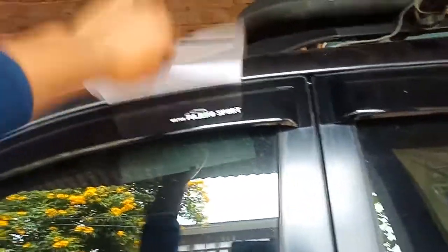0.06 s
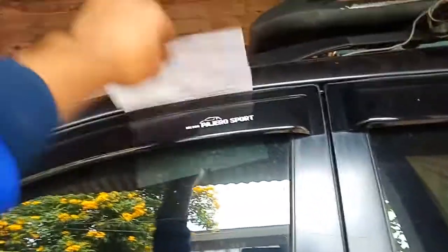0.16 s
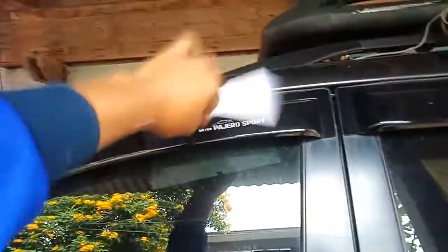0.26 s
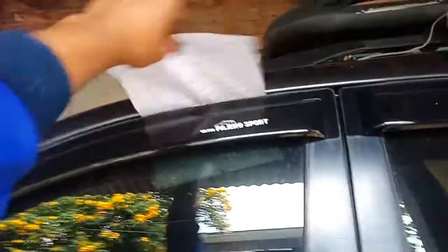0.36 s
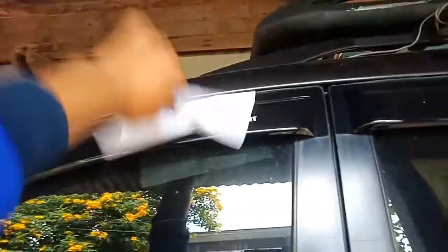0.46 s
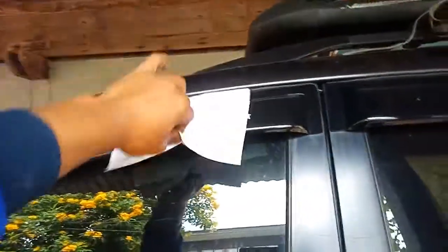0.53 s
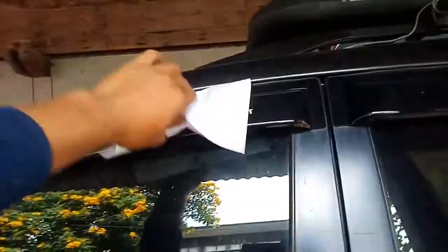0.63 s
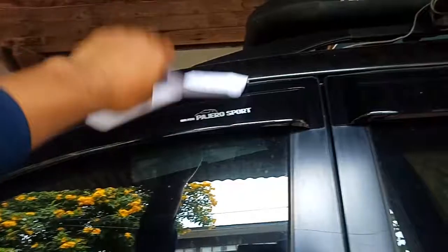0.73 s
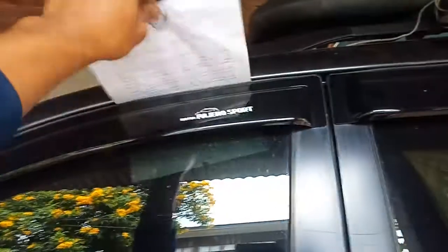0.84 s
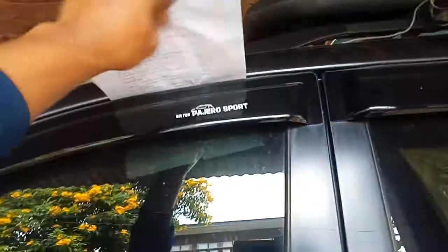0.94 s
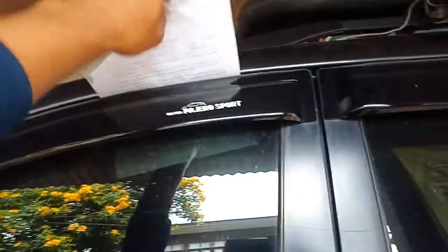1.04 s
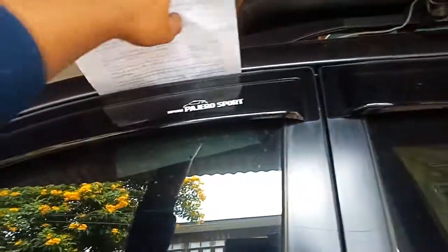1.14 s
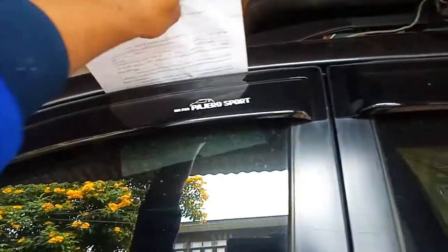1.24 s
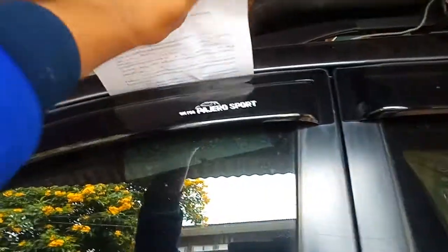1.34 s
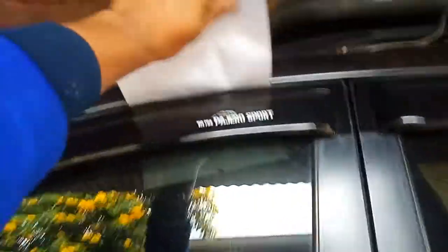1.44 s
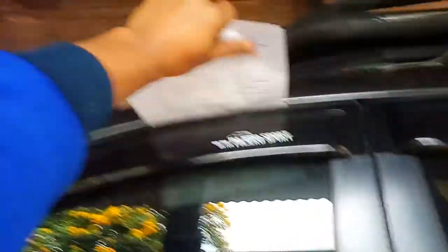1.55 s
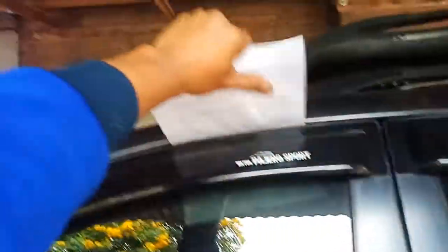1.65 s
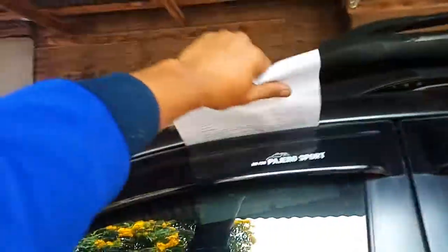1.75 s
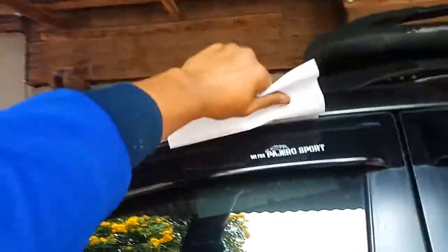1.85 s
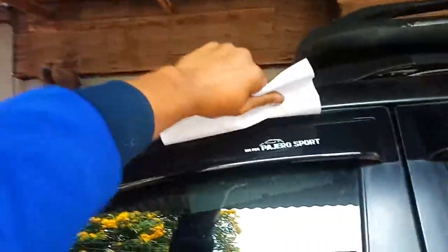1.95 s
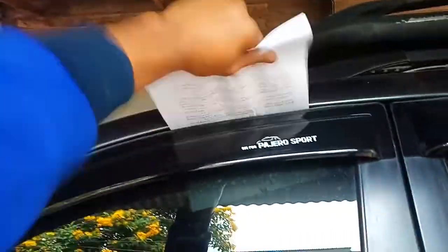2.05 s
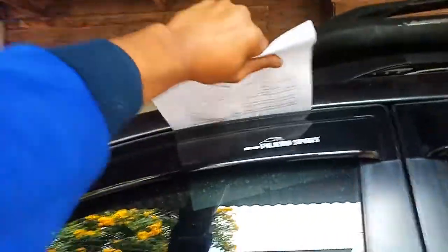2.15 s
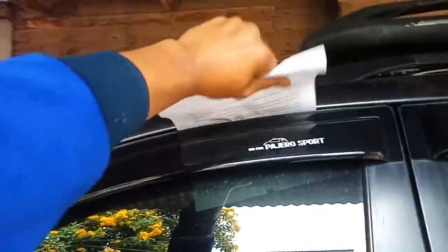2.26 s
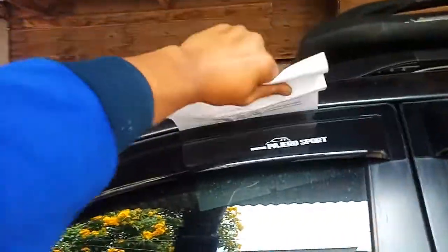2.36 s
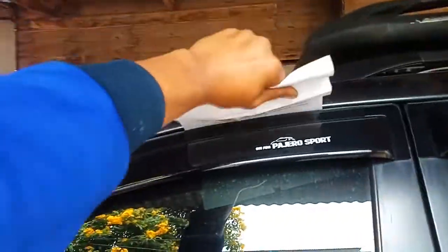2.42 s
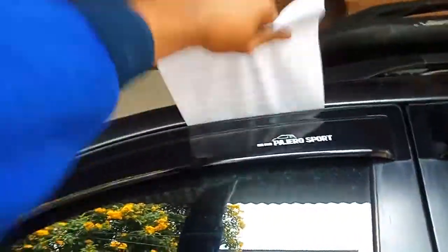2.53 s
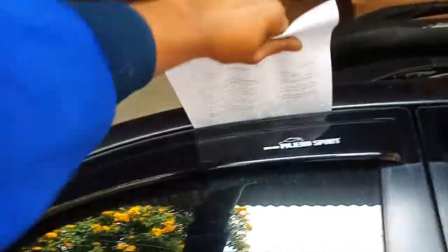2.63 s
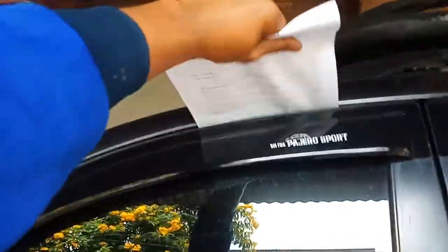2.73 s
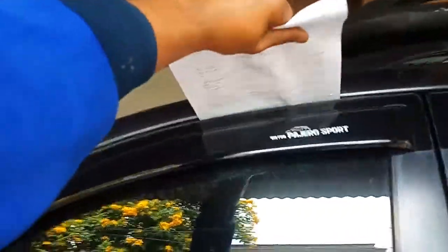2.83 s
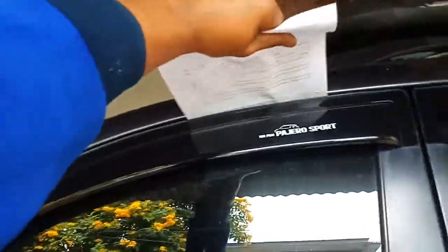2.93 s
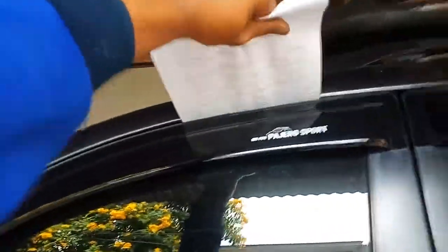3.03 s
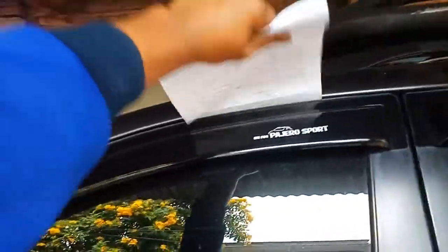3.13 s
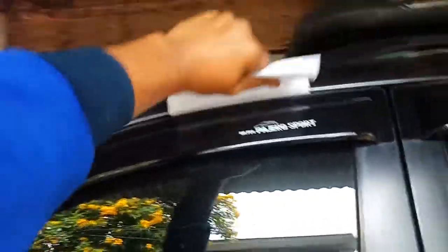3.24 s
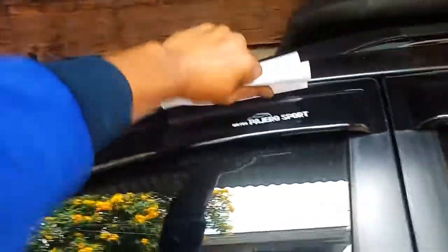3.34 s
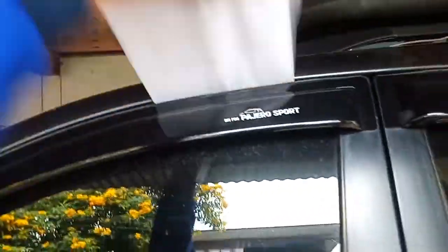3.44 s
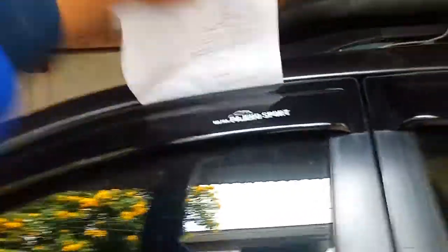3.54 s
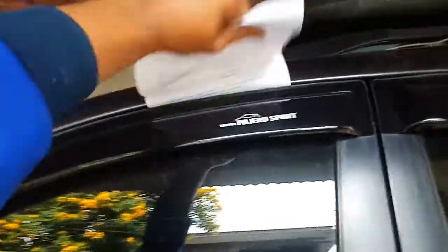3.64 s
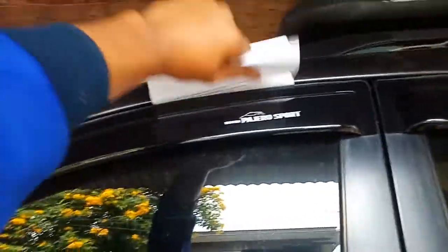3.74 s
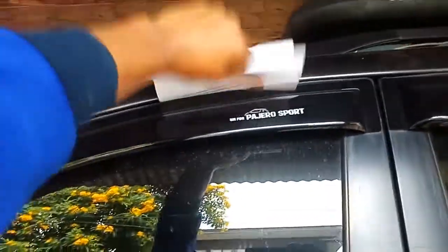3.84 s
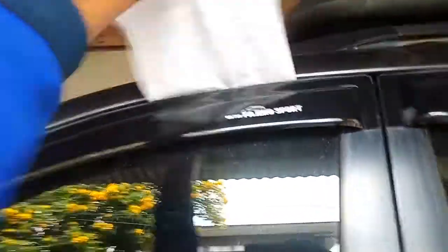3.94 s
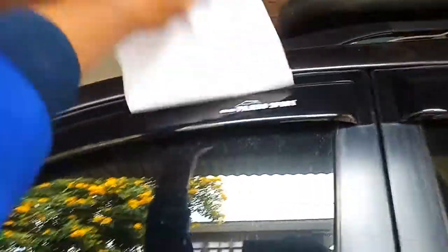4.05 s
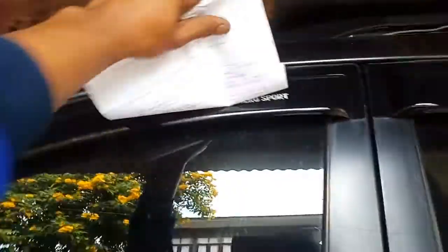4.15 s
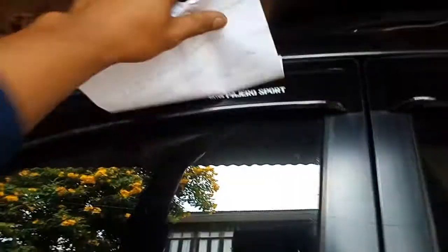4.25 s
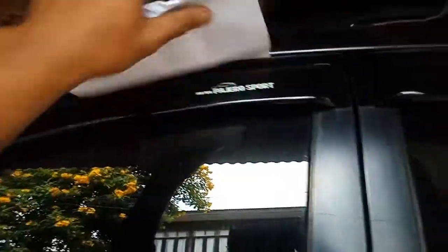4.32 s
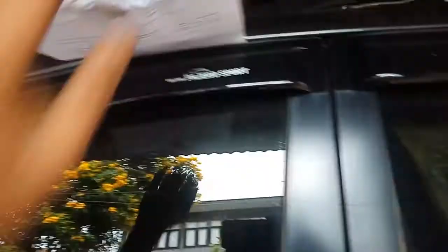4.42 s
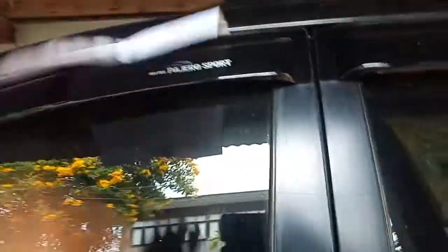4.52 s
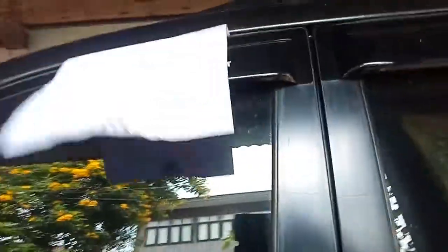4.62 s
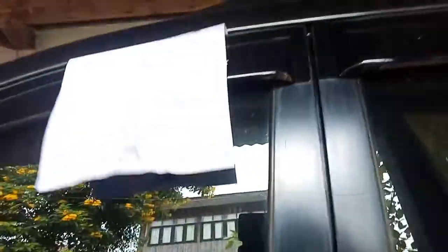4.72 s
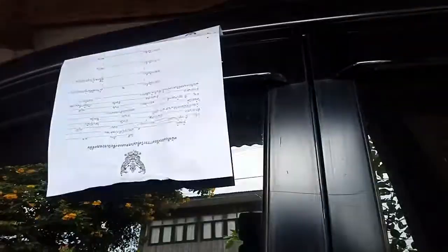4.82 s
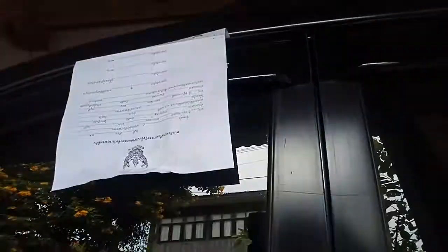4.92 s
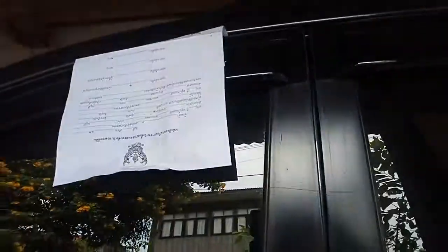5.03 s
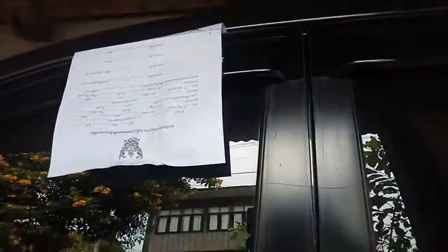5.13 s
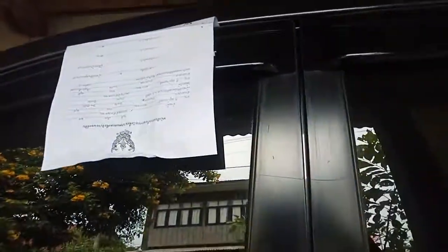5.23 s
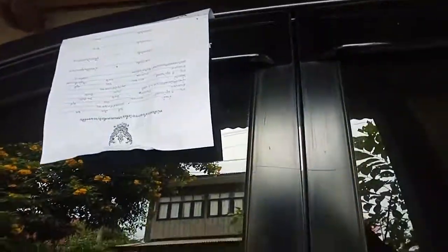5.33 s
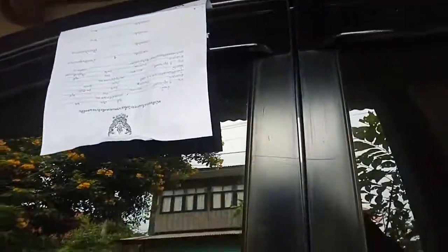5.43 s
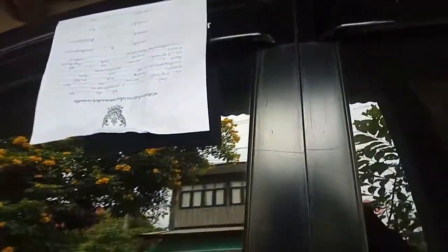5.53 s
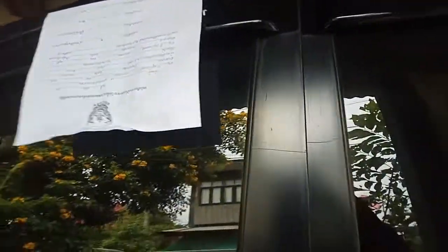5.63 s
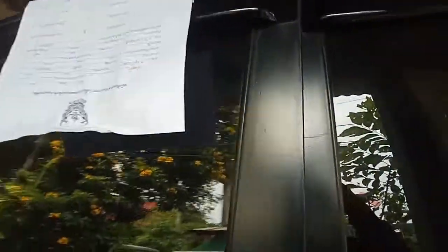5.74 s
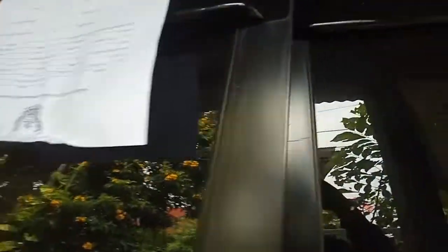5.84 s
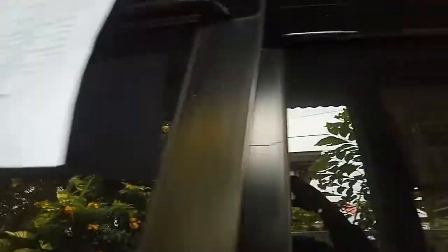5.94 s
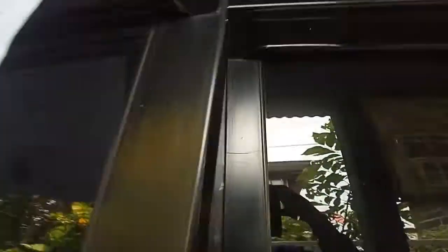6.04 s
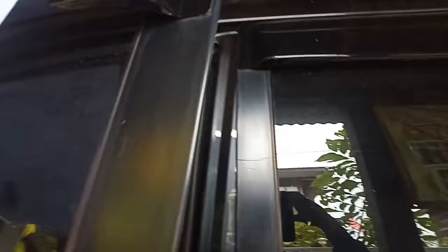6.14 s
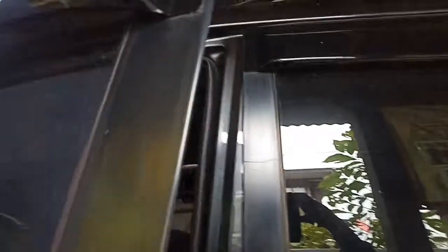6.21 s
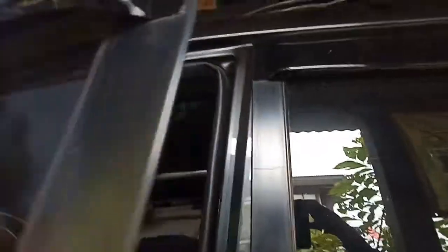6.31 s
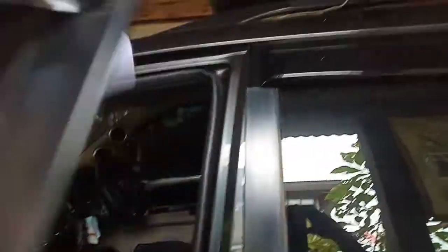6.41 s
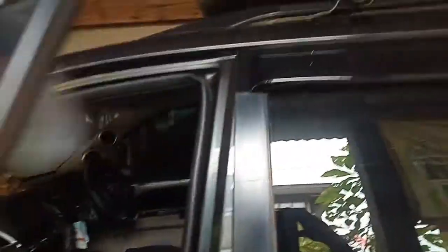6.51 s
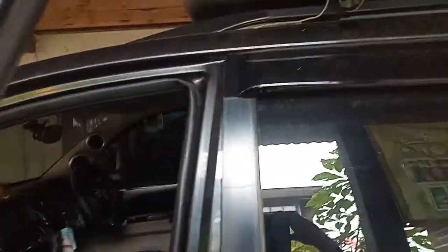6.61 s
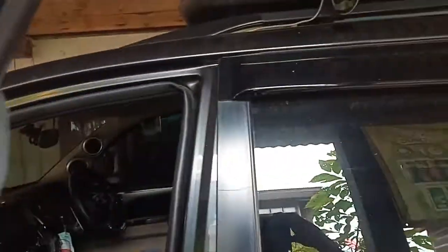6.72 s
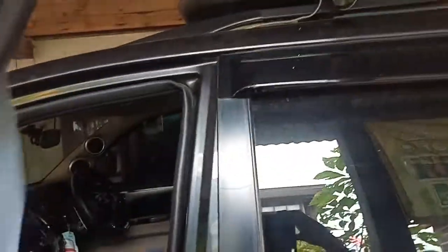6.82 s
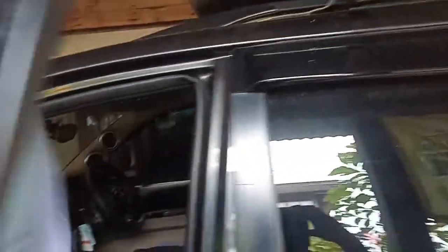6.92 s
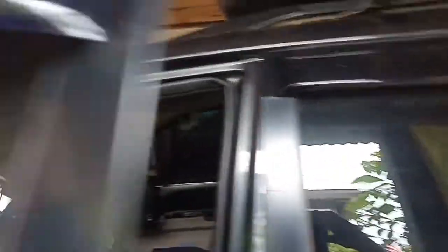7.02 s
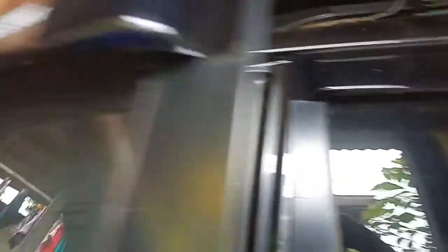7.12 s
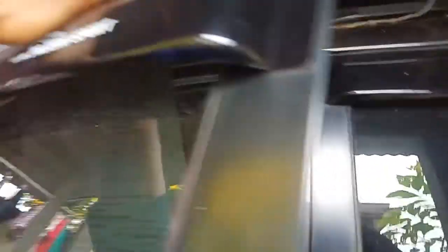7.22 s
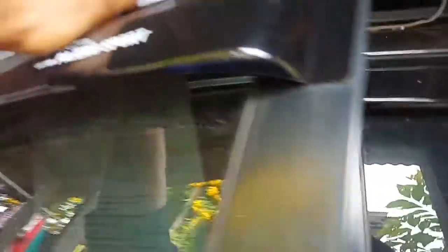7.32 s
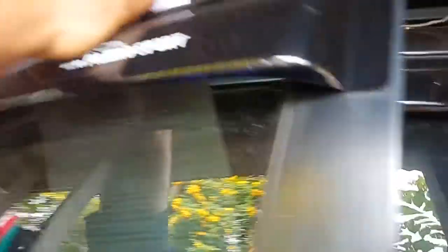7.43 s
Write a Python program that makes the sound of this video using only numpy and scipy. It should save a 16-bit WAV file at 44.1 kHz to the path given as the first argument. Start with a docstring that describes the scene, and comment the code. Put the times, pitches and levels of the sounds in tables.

```python
"""Under a carport a hand tugs a sheet of paper pinched in the rubber seal of a closed car door.
From the start the sheet crackles (bursts of clicks), rustles (filtered clicks) and flaps taut (low sines);
a thin tone swells in a pause, later the paper squeaks on the rubber (sagging harmonics).
Then the latch lets go with a thunk, the handle knocks back (ringing panel and clicks), the door leaves
its seal with a soft boom and the freed sheet rustles a last time. Faint air and swishes lie around it all."""
import sys
import numpy as np
from scipy import signal
from scipy.fft import rfft, irfft
from scipy.io import wavfile

SR = 44100
rng = np.random.default_rng(int(sys.argv[2]) if len(sys.argv) > 2 else 0)


def transcribe(signal):
    """Save signal, clipped to [-1, 1], as a 16-bit WAV file at the path in sys.argv[1]."""
    frames = np.atleast_2d(signal).T
    limited = np.clip(frames, -1, 1)
    pcm = np.round(limited * 32767).astype(np.int16)
    wavfile.write(sys.argv[1], SR, pcm)


N = 329413
TIME = np.arange(N) / SR


def undb(db):
    """Turn decibels into a plain gain."""
    return 10 ** (np.asarray(db) / 20)


def unit(x):
    """Scale to rms 1."""
    return x / np.sqrt(np.mean(x ** 2) + 1e-20)


def add(out, s, x):
    """Mix x into out from time s."""
    i = max(int(s * SR), 0)
    out[i:i + len(x)] += x[:max(N - i, 0)]


def fade(t, t60):
    """Exponential ring that starts at t = 0 and drops 60 dB in t60 seconds."""
    return (t >= 0) * np.exp(-np.log(1000) * np.maximum(t, 0) / t60)


def butter(x, order, hz, kind="low"):
    """Smooth low-pass or high-pass filter."""
    return signal.sosfilt(signal.butter(order, hz, kind, fs=SR, output="sos"), x)


def colour(x, points, size=2048):
    """Causal filter whose loudness curve runs through (frequency [Hz], level [dB]) points."""
    hz, db = np.transpose(points)
    f = np.maximum(np.fft.rfftfreq(size, 1 / SR), 1)
    curve_db = np.interp(np.log(f), np.log(hz), db)
    # folding the cepstrum makes the filter answer at once (minimum phase)
    cepstrum = irfft(np.log(undb(curve_db)))
    cepstrum[1:size // 2] *= 2
    cepstrum[size // 2 + 1:] = 0
    response = irfft(np.exp(rfft(cepstrum)))
    return signal.fftconvolve(x, response)[:len(x)]


def resonate(x, hz, q):
    """One broad resonance with gain 1 at its centre."""
    return signal.lfilter(*signal.iirpeak(hz, max(q, .4), SR), x)


def clicks(count, rate, spread_db):
    """Random tiny clicks of uneven size, about rate of them per second."""
    unevenness = undb(spread_db * np.clip(rng.standard_normal(count), -2, 2))
    size = rng.standard_normal(count) * unevenness
    return unit(size * (rng.random(count) < rate / SR))


# tone colour of the outdoor air: (frequency [Hz], level [dB])
AIR_COLOUR = [(18, -43.5), (30, -8.5), (48, -13), (109, 0.5), (345, -5), (584, -7.5), (866, -7.5),
              (1500, -10.5), (2830, -10), (4190, -15.5), (5590, -31), (14800, -31.5), (16000, -39)]


def outdoor_air(level_db=-63):
    """Faint outdoor air: steady random noise, shaped in colour."""
    return unit(colour(rng.standard_normal(N), AIR_COLOUR)) * undb(level_db)


# tone colour of the carport's echo: (frequency [Hz], level [dB])
ECHO_COLOUR = [(60, -22.5), (150, 0), (1000, 2), (4200, -4), (6000, -8), (15000, -1)]


def carport(x, wet_db=-9.5, t60=0.18):
    """Roof, walls and car body return a short, dense echo."""
    t = TIME[:SR // 2]
    reflections = clicks(len(t), 5000, 1.3) * fade(t, t60) * (1 - np.exp(-t / 0.00033))
    echo = colour(reflections, ECHO_COLOUR)
    echo = echo / np.sqrt(np.sum(echo ** 2))
    return x + undb(wet_db) * signal.fftconvolve(x, echo)[:N]


# a faint held tone in the pause between two tugs: (harmonic number, relative level [dB])
TONE_HARMONICS = [(2, -70.5), (3, -61), (5, -67), (7, -64), (8, -62)]


def tone(base_hz=343, centre_s=0.717, length_s=.075, gain_db=3):
    """A thin, steady stack of harmonics swells and fades."""
    stack = sum(undb(db) * np.sin(2 * np.pi * round(k) * base_hz * TIME) for k, db in TONE_HARMONICS)
    swell = np.exp(-((TIME - centre_s) / length_s) ** 2)
    return stack * swell * undb(gain_db)


# faint swishes and scuffs, timed at their middle:
# (time [s], relative level [dB], length [s], centre [Hz], glide [Hz per s], half width [Hz])
SWISH_EVENTS = [(1.13, -62, 0.044, 6100, 0, 100), (1.94, -65.5, 0.08, 5960, -4000, 250),
                (2.362, -58.5, 0.072, 4400, 0, 195), (4.761, -62.5, 0.13, 3500, 0, 310),
                (5.172, -63, 0.075, 3900, 0, 280), (5.19, -74, 0.054, 5920, 14000, 400),
                (5.325, -59, 0.067, 4830, 9003, 200), (6.207, -70, 0.049, 5870, 9998, 400),
                (6.311, -62, 0.066, 5050, 8997, 250), (6.317, -33, 0.0098, 762, -4, 270),
                (6.38, -36, 0.022, 825, 0, 250), (6.425, -39.5, 0.024, 716, -4, 230),
                (6.562, -54, 0.079, 3140, -5000, 400), (6.853, -50, 0.037, 1150, 0, 400),
                (7.117, -56.5, 0.14, 3880, 0, 330)]


def swishes():
    """Soft, narrow bands of hiss, some of which glide: slow noise riding on a high carrier wave."""
    out, t = np.zeros(N), TIME[:SR // 2] - .25
    for s, db, length, hz, glide, width in SWISH_EVENTS:
        hiss = unit(butter(rng.standard_normal(len(t)), 2, width))
        carrier = np.cos(2 * np.pi * (hz + glide * t / 2) * t)
        add(out, s + t[0], hiss * carrier * np.exp(-(t / length) ** 2) * undb(db))
    return out


# blows on the door:
# (time [s], relative level [dB], contact [s], relative latch clack [dB], pitch of the struck part [Hz])
DOOR_BLOWS = [(5.257, -24, 0.00096, 3.5, 1500), (5.31, -30.5, 0.0035, 2, 1020),
              (5.4106, 0, 0.00041, -8.5, 1050), (5.449, -16, 0.00048, -5, 2500),
              (5.609, -35.5, 0.00056, 8, 3000), (5.727, -42.5, 0.00033, 17, 2660),
              (5.757, -44, 0.00033, 15, 3400), (5.774, -46, .0005, 19, 2360),
              (5.82, -16.5, 0.00035, 10.5, 3480), (5.885, -23, 0.0014, 4, 653),
              (6.639, -22.5, 0.0023, -12, 420), (7.234, -33.5, 0.0006, 12.5, 1800)]
# door panel and cavity; the heavy panel answers late:
# (frequency [Hz], relative level [dB], time to fall 60 dB [s], delay [s])
PANEL_MODES = [(99, -23.5, .15, 0.0154), (144.6, -20.5, 0.23, 0.0127), (191, -19.5, 0.06, .012),
               (333, -27, 0.31, 0), (424, -3.5, 0.016, 0.0088), (463, -13.5, 0.069, .004),
               (589, -27, 0.052, 0.01), (780, -36, 0.07, 0.009), (903, -16, 0.055, 0.0017),
               (1044, -15, 0.02, 0.0078), (1303, -19.5, 0.035, 0.0033), (1490, -18.5, 0.033, 0),
               (1970, -19, 0.026, 0.017)]
# tone colour of the latch: (frequency [Hz], level [dB])
LATCH_COLOUR = [(100, -27), (400, 2.5), (1000, 2), (2000, 2), (3400, -2.5), (4500, -19.5), (5600, -32),
                (7000, -38.5), (15000, -66)]


def door(clack_db=-9, clack_t60=0.026, rattle_db=-19, rattle_t60=0.19, scrape_s=0.0013,
         heft=0.3, part_db=4, part_q=4, gain_db=-1):
    """Each blow rings the panel modes and rattles the latch; the cabin booms softly as the seal parts."""
    out, t = np.zeros(N), TIME[:SR // 2] - .02
    # the latch parts scrape for an instant before they strike
    scrape = (t < 0) * np.exp(-np.abs(t) / scrape_s)
    shape = scrape + fade(t, clack_t60) + undb(rattle_db) * fade(t, rattle_t60)
    for s, db, contact, latch_db, part_hz in DOOR_BLOWS:
        panel = np.zeros(len(t))
        for hz, mode_db, t60, lag in PANEL_MODES:
            # light blows hardly stir the lowest modes
            mode_gain = undb(mode_db + heft * db * (hz < 260))
            panel += mode_gain * np.sin(2 * np.pi * hz * (t - lag)) * fade(t - lag, t60)
        # a longer contact softens the blow
        push = np.exp(-TIME[:400] / (contact / 4))
        body = np.convolve(panel, push / push.sum())[:len(t)]
        clack = colour(clicks(len(t), 12000, 1.4) * shape, LATCH_COLOUR) * undb(clack_db + latch_db)
        clack = clack + undb(part_db) * resonate(clack, part_hz, part_q)
        add(out, s + t[0], (body + clack) * undb(db + gain_db))
    boom = np.sin(2 * np.pi * 105 * TIME) * np.exp(-((TIME - 5.945) / 0.037) ** 2)
    return out + undb(-45.5) * boom


# paper sticking and slipping on rubber, timed at the middle:
# (time [s], level of the lowest harmonic [dB], length [s], pitch at the middle [Hz])
SQUEAK_EVENTS = [(2.525, -20.5, 0.017, 349), (2.593, -24, 0.0092, 327), (3.006, -22, 0.014, 351.5)]


def squeaks(slope_db=-9):
    """A few stick-slip cycles on the seal, sagging in pitch."""
    out, t = np.zeros(N), TIME[:SR // 5] - .1
    for s, db, length, hz in SQUEAK_EVENTS:
        phase = 2 * np.pi * hz * (t - 1.1 * t ** 2)
        slips = sum(undb(slope_db * k) * np.sin((k + 1) * phase) for k in range(4))
        add(out, s + t[0], slips * np.exp(-(t / length) ** 2) * undb(db))
    return out


# the sheet jerked taut: (time [s], level [dB], pitch [Hz])
FLAP_EVENTS = [(0.075, -14.5, 165.5), (0.289, -28, 130), (.317, -14.5, 166), (0.799, -20, 150),
               (2.042, -12, 168.5), (2.467, -16, 163.4), (2.979, -23.5, 127), (3.412, -12.5, 127),
               (3.448, -18.5, 167), (3.89, -18.5, 134.2)]


def flaps(t60=0.089, second_mode_db=-11, bass_db=-6):
    """Pulled taut, the sheet thumps like a slack drum skin."""
    out, t = np.zeros(N), TIME[:SR // 3]
    for s, db, hz in FLAP_EVENTS:
        phase = 2 * np.pi * hz * t
        skin = np.sin(phase)
        skin += undb(second_mode_db) * np.sin(1.45 * phase)
        skin += undb(bass_db) * np.sin(0.74 * phase)
        add(out, s, skin * fade(t, t60) * (1 - np.exp(-t / 0.0023)) * undb(db))
    return out


# each stroke of the hand or swing of the door slides and bends the sheet:
# (start time [s], hold [s], relative rustle level [dB], relative low flutter level [dB])
STROKE_EVENTS = [(0, 0.0067, -34, -41), (.075, 0.12, -30, -31.5), (0.286, .15, -26, -33),
                 (0.478, .11, -43, -61), (0.78, 0.039, -33, -31), (0.879, .13, -42.5, -41),
                 (1.086, .035, -47, -45.5), (1.191, 0.047, -40, -40), (1.35, 0.1, -42.5, -45),
                 (1.498, 0.11, -45, -40.5), (1.635, 0.16, -43.5, -43.5), (1.977, 0.032, -57, -43.5),
                 (2.02, .26, -33.5, -30), (2.464, .21, -33.5, -32), (2.729, 0.19, -52, -40),
                 (2.943, .02, -41.5, -38), (2.968, .17, -34.5, -29), (3.312, 0.014, -36.5, -44.5),
                 (3.413, 0.14, -27.5, -29.5), (3.695, .08, -42.5, -43), (3.887, 0.19, -29, -35.5),
                 (4.081, 0.088, -47, -49), (4.257, 0.041, -57, -62), (5.26, 0.3, -57.5, -55),
                 (5.779, 0.091, -54, -50), (6.222, .07, -50, -56), (6.304, 0.14, -43, -52),
                 (6.639, 0.52, -50, -62)]


def effort(t, column, attack_s=0.0071, sag_db_per_s=17.5, release_db_per_s=228.5):
    """Gain of rustle (column 0) or flutter (1) at times t: strokes take hold fast, slacken, die away."""
    power = np.zeros(len(t))
    for s, hold, *db in STROKE_EVENTS:
        near = (t > s) & (t < s + 1)
        age = t[near] - s
        # the release adds to the sag once the hold is over
        fall_db = sag_db_per_s * age + release_db_per_s * np.maximum(age - hold, 0)
        power[near] += (np.minimum(age / attack_s, 1) * undb(db[column] - fall_db)) ** 2
    return np.sqrt(power + 1e-12)


# tone colour of the rubbing fibres: (frequency [Hz], level [dB])
RUBBING_COLOUR = [(100, -20), (350, -4), (1000, 0.5), (2300, 0), (3300, -2), (4300, -6.5), (5200, -21.5),
                  (7000, -32), (15000, -49.5)]
# tone colour of the fluttering sheet: (frequency [Hz], level [dB])
FLUTTER_COLOUR = [(50, -21.5), (90, -4.5), (160, 0), (240, -2.5), (350, -1), (550, -9.5), (1000, -19),
                  (3000, -61.5)]


def handling(rustle_db=-1, flutter_db=-1, uneven_db=2.5, uneven_hz=70, wobble_db=3, wobble_hz=18):
    """Fibres rub in uneven little slips as the sheet slides, while its whole surface wobbles the air."""
    slips = unit(butter(rng.standard_normal(N), 2, uneven_hz))
    wobble = unit(butter(rng.standard_normal(N), 2, wobble_hz))
    rustle = unit(colour(clicks(N, 12000, 1.2) * undb(uneven_db * slips), RUBBING_COLOUR))
    flutter = unit(colour(clicks(N, 3000, 2.2) * undb(wobble_db * wobble), FLUTTER_COLOUR))
    rustle = rustle * effort(TIME, 0) * undb(rustle_db)
    return rustle + flutter * effort(TIME, 1) * undb(flutter_db)


def crinkles(count=70, tugging_ends_s=4.25, above_rustle_db=3.5, spread_db=5.5,
             typical_s=0.0039, typical_crisp_db=-49):
    """Small creases give way at random, as strongly as the hand works the sheet; rows as in CREASES."""
    s = (np.arange(count) + rng.random(count)) * tugging_ends_s / count
    size, length, crisp = rng.standard_normal((count, 3)).T
    db = 20 * np.log10(effort(s, 0)) + above_rustle_db + spread_db * size
    return list(zip(s, db, typical_s * np.exp(.3 * length), typical_crisp_db + 7 * crisp))


# single creases buckling in the sheet, strong and weak, timed at the main snap:
# (time [s], relative level [dB], length [s], relative treble crispness [dB])
CREASES = [(0.0764, -9, 0.006, -21), (0.163, -18.5, 0.016, -49.5), (0.277, -19, 0.015, -44),
           (.2894, -7.5, 0.0046, -23.5), (0.3152, -11.5, 0.013, -29.5), (0.376, -26, 0.0038, -21),
           (0.3907, -15.5, 0.003, -48), (.402, -13, 0.0044, -50), (0.412, -14, 0.0027, -49),
           (0.427, -15, .0034, -25.5), (0.48, -21.5, 0.017, -48), (0.7995, -17, 0.012, -43),
           (0.815, -31, 0.005, -44), (0.917, -17.5, 0.0043, -55), (0.987, -25, 0.0051, -63),
           (1.262, -18.5, .0028, -32), (1.342, -22, 0.0028, -40), (1.3592, -16, 0.0037, -54),
           (1.438, -22.5, 0.0052, -50), (1.4492, -27, 0.0048, -61), (1.542, -26, 0.0044, -36),
           (1.5603, -21, 0.0085, -57), (1.582, -14, 0.0037, -56), (1.639, -22, 0.0053, -50),
           (1.6504, -21, 0.0064, -41.5), (1.689, -22.5, .005, -64), (1.707, -25.5, 0.0044, -58.5),
           (1.771, -26.5, 0.012, -58), (1.8, -21, 0.0011, -51), (1.832, -27.5, 0.0026, -28),
           (1.85, -18.5, .0032, -29.5), (2.0286, -13, 0.0068, -24), (2.0392, -7.5, 0.0036, -29),
           (2.1064, -14.5, 0.0035, -22), (2.1332, -13.5, 0.0057, -27.5), (2.1448, -8.5, 0.0039, -39),
           (2.2065, -17, 0.0045, -61), (2.235, -20, 0.0072, -54), (2.282, -24, 0.0042, -64),
           (2.438, -20, 0.0042, -29), (2.466, -11.5, 0.0072, -24.5), (2.584, -15.5, 0.003, -25),
           (2.588, -25.5, .0075, -49), (2.643, -17, 0.0031, -55.5), (2.6506, -15, 0.0043, -57),
           (2.6743, -15, 0.0034, -36), (2.785, -29, 0.0035, -54), (2.859, -20.5, 0.0061, -34.5),
           (2.9679, -10, 0.0048, -32.5), (3.0607, -22, 0.004, -42), (3.0743, -16, 0.0062, -44.5),
           (3.0963, -8, 0.0046, -45.5), (3.121, -18.5, 0.0085, -39.5), (3.167, -20, .004, -39.5),
           (3.189, -11, 0.0039, -60), (3.195, -23.5, 0.0053, -52), (3.3023, -15, 0.0057, -38.5),
           (3.3972, -28, 0.0042, -60), (3.414, -10, 0.0082, -30), (3.418, -9.5, 0.0063, -18.5),
           (3.4885, -12, 0.0028, -24), (3.508, -13, 0.0028, -30), (3.5248, -18.5, 0.0075, -39),
           (3.643, -28, 0.0057, -68.5), (3.7207, -19, 0.0048, -47), (3.7622, -22.5, 0.0044, -56),
           (3.892, -16.5, 0.012, -29), (3.904, -9, .012, -27), (3.998, -16.5, 0.0038, -28),
           (4.021, -24.5, 0.0031, -34), (4.0357, -10.5, 0.0043, -22.5), (4.063, -17, 0.0044, -34),
           (4.097, -28.5, 0.0045, -43), (4.1454, -29.5, 0.0044, -54), (4.187, -36.5, 0.0035, -48),
           (4.515, -53, 0.0064, -54), (4.589, -58, 0.008, -48), (6.307, -26, 0.0071, -55),
           (6.37, -27.5, 0.0084, -53), (6.389, -36, .016, -58), (6.416, -22.5, .0075, -54.5),
           (6.9313, -23, 0.0081, -19.5)]
# tone colour of the sheet: (frequency [Hz], level [dB])
PAPER_COLOUR = [(88, -31), (150, -8), (264, -8.5), (354, -2.5), (545, -10.5), (716, -5), (998, -9.5),
                (1390, -5), (1690, -7), (2220, -2), (3350, -12.5), (4320, -8), (7180, -32), (13700, -52),
                (16000, -45.5)]


def crackles(gain_db=-1, ring_q=1.4, ring_db=1, snap_db=-6, crisp_db=-7, tail_db=-18, tail_t60=0.1,
             lead_share=0.63, fall_share=0.81, side_db=-3, edge_hz=6300, edge_slope=0.044,
             body_slope=0.17, body_spread_db=2, crisp_t60=0.084, count=4096):
    """Each crease gives way in an avalanche of clicks round one main snap; its patch rings briefly."""
    out, lead = np.zeros(N), .025
    t = np.arange(count) / SR - lead
    for s, db, length, treble_db in list(CREASES) + crinkles():
        # a buckling patch rings higher the crisper its snap
        patch_hz = 2220 * 2 ** (.006 * (treble_db + 40.5))
        front = np.abs(t / (lead_share * length)) ** (5 / 3)
        swell = np.exp(-np.where(t < 0, front, t / (fall_share * length)))
        burst = unit(clicks(count, 9000, 3.5) * (swell + undb(tail_db) * fade(t, tail_t60)))
        # the treble dies sooner than the rest
        early = np.where(t < 0, 1, fade(t, crisp_t60))
        crisp = unit(butter(burst * early, 2, 7000, "high")) * undb(treble_db + crisp_db)
        # short events are nearly one single snap
        snap = np.sqrt(count) * undb(snap_db) * (0.0047 / length) ** 2.5
        burst[int((lead - .0005) * SR)] += snap * rng.choice([-1, 1])
        sheet = colour(burst, PAPER_COLOUR)
        # every patch has its own side modes, one below and one above its centre
        ratios = rng.uniform([.55, 1.15], [.9, 2.1])
        sides = sum(resonate(sheet, patch_hz * ratio, 9) for ratio in ratios)
        ring = resonate(sheet, patch_hz, ring_q)
        sheet = unit(sheet + undb(ring_db) * ring + undb(side_db) * sides)
        # strong crackles move more of the sheet and have more body; crisp ones reach higher
        body_db = body_slope * (db + 15.0) + body_spread_db * rng.standard_normal()
        sheet = sheet + butter(sheet, 1, 450) * (undb(body_db) - 1)
        edge = min(edge_hz * 2 ** (edge_slope * (treble_db + 36.5)), SR / 3)
        sheet = butter(sheet, 3, edge)
        # longer crackles carry more energy
        add(out, s - lead, (sheet + crisp) * undb(db + gain_db) * np.sqrt(length * SR / count))
    return out


def scene():
    """Paper and door close by, over faint outdoor air."""
    echoing = carport(crackles() + flaps() + squeaks() + door())
    return (echoing + handling() + swishes() + tone() + outdoor_air())[None]


def record(dry):
    """Thin the deep bass, round the highest peaks and cut the top."""
    thin = butter(dry, 4, 58, "high")
    rounded = thin / (1 + thin ** 6) ** (1 / 6)
    top_cut = signal.ellip(8, .2, 70, 15900, fs=SR, output="sos")
    return signal.sosfilt(top_cut, rounded)


dry = scene()
out = record(dry)
transcribe(out)
```